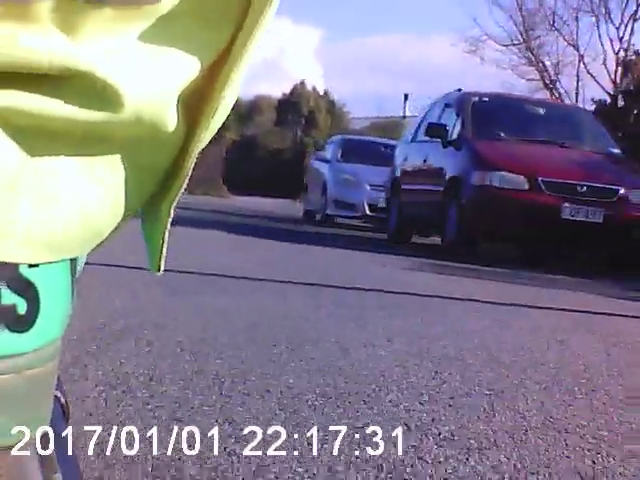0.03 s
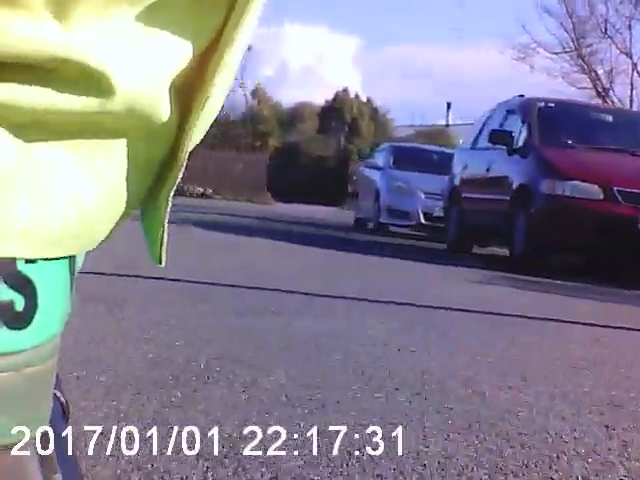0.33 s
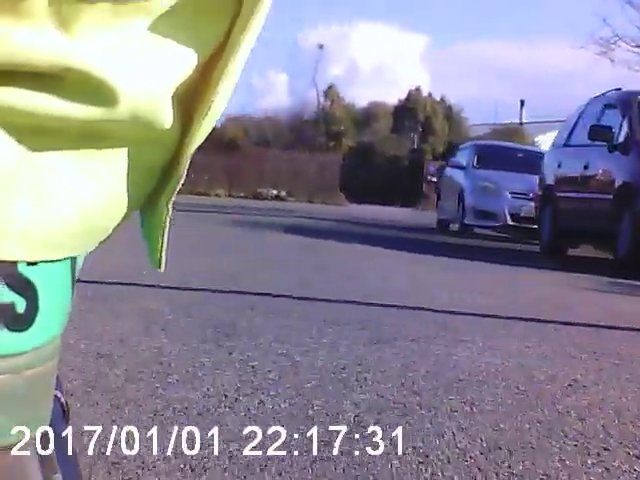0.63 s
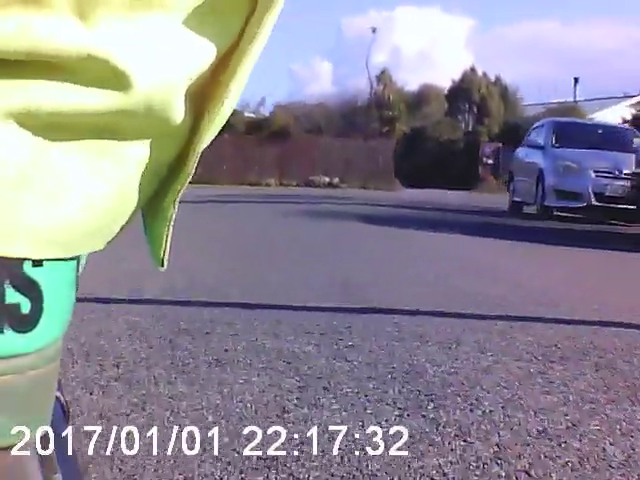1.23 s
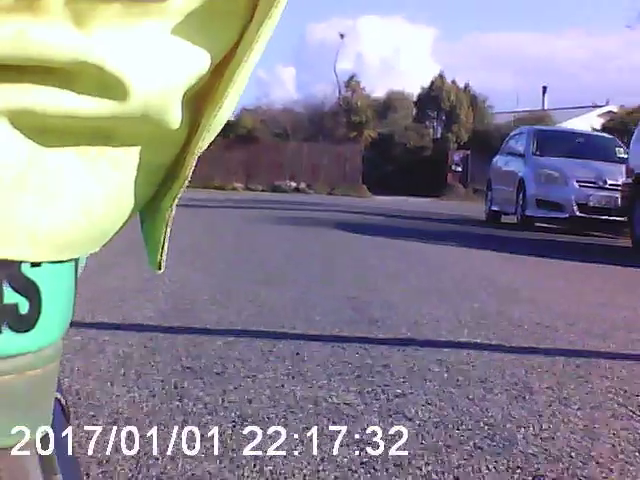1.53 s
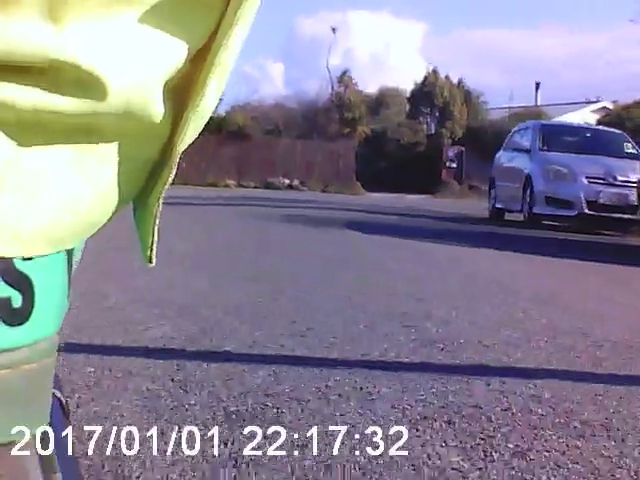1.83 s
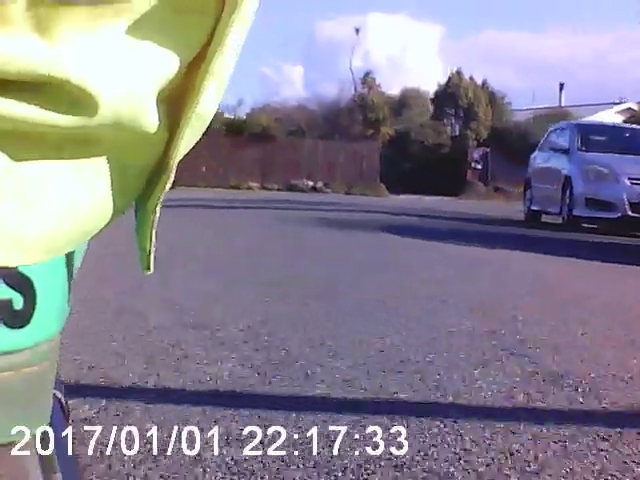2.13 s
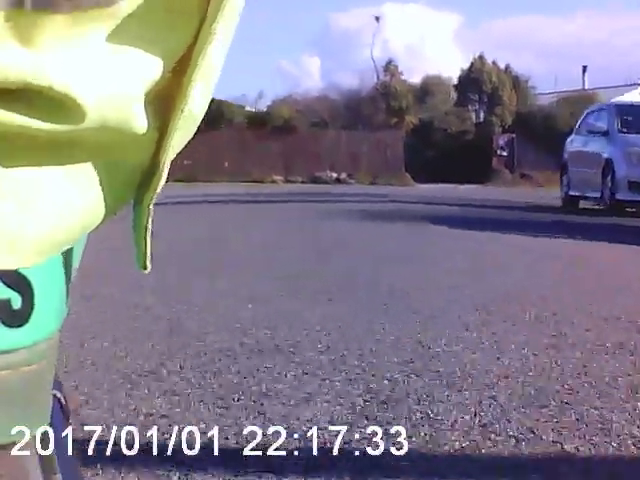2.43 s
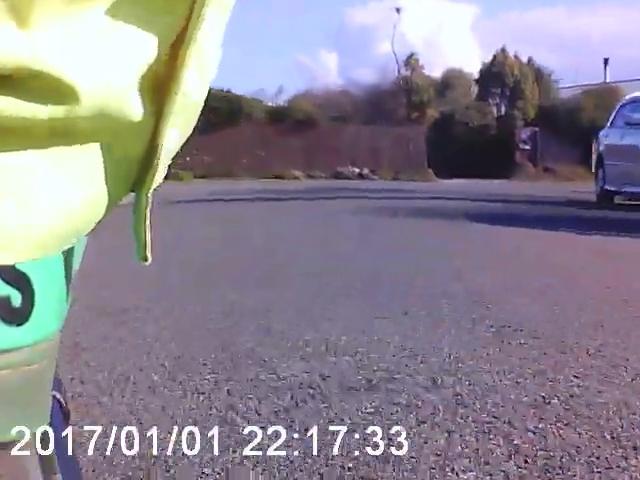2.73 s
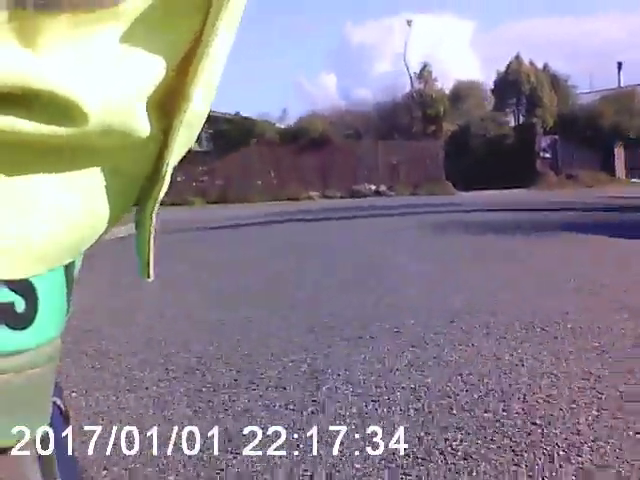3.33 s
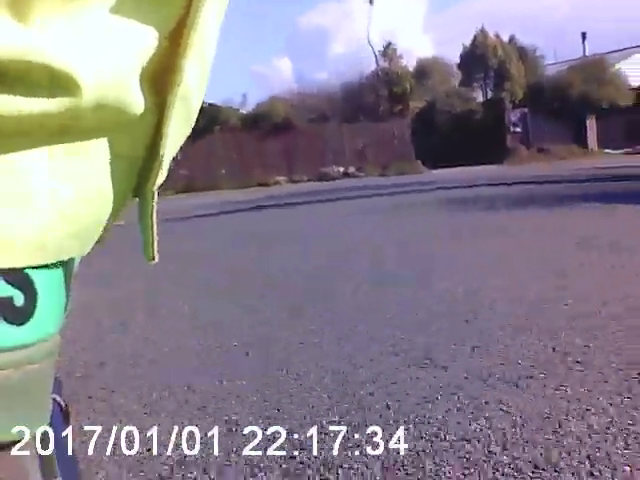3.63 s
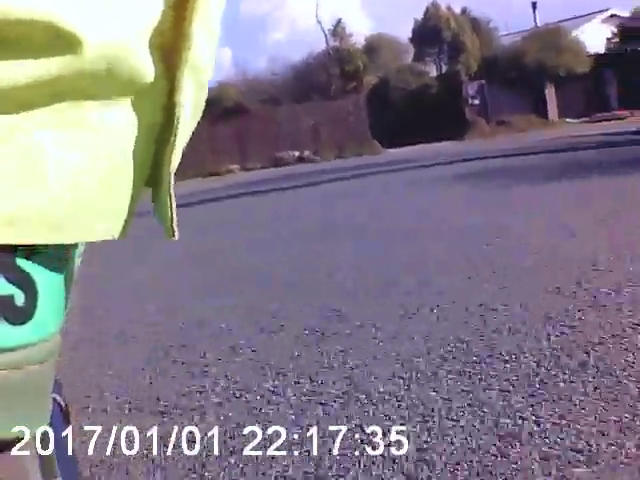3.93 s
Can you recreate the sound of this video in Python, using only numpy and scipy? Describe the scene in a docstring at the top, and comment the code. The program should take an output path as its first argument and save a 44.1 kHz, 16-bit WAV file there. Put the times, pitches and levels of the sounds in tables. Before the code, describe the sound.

An electric scooter rolls over coarse asphalt with a low rumble, hollow knocks and a clacking loose panel. Near the end a whine climbs, wind rises and the microphone fixed to it overloads and crackles.

```python
"""Electric scooter on coarse asphalt

The road shakes the frame of a scooter, heard from a small camera fixed to it. Impacts excite the damped
modes of the hollow body and a loose panel, which thud and clack, and a gritty buzz rides on the rumble
whenever it is strong. Near the end the ride speeds up: a whine climbs, the frame throbs,
wind rises and the microphone overloads and crackles."""
import sys
import numpy as np
from scipy import signal
from scipy.fft import rfft, irfft, next_fast_len
from scipy.io import wavfile
from scipy.ndimage import uniform_filter1d, map_coordinates

SR = 44100
rng = np.random.default_rng(int(sys.argv[2]) if len(sys.argv) > 2 else 0)


def inscribe(sig):
    """Save sig as 16-bit PCM at rate SR to the path in sys.argv[1].

    A 1-D sig is mono; a 2-D sig holds one channel per row.
    Samples are clipped to [-1, 1] before scaling.
    """
    pcm = np.round(np.clip(np.atleast_2d(sig).T, -1, 1) * 32767)
    wavfile.write(sys.argv[1], SR, pcm.astype(np.int16))


N = 176400

# noise spectra (frequency [Hz], relative density [dB])
HISS_SPECTRUM = [(2000, 0), (7500, -2), (9000, -21.5)]
WIND_SPECTRUM = [(60, -25.5), (150, -2), (230, 1), (380, 0.5), (480, -6), (650, -12), (1000, -21),
                 (2000, -21), (4000, -46), (8000, -68.5)]
TYRE_SPECTRUM = [(60, -20.5), (150, -14.5), (240, 2.5), (400, 0.5), (480, -10), (600, -10.5), (850, -23),
                 (1600, -24.5), (3000, -48), (7500, -50)]
GRIT_SPECTRUM = [(300, -5.5), (1000, -0.5), (1900, 10.5), (3700, 4.5), (4600, -5), (5600, -9.5),
                 (6500, -15), (8000, -26)]
CRACKLE_SPECTRUM = [(300, -12), (1000, -4), (1900, 2.5), (3600, 3.5), (4600, -4.5), (5600, -3.5),
                    (6500, -12.5), (8000, -21.5)]
ROAD_SPECTRUM = [(10, -5.5), (20, -16), (33, -6), (50, 0.5), (75, -1.5), (102, 0), (118, -7.5), (140, -21),
                 (200, -47.5), (400, -97)]
# noise envelopes (time [s], level [dB])
WIND_LEVEL = [(0, -54), (2.8, -34.5), (3.1, -29.5), (3.4, -16), (3.63, -22.5), (3.78, -19), (3.855, -21),
              (3.94, -14.5), (4, -15.5)]
ROLLING_LEVEL = [(0, -31.5), (.6, -37), (1.2, -31.5), (1.8, -35), (2.5, -33), (4, -35)]
CRACKLE_LEVEL = [(3.128, -36.5), (3.19, -34), (3.27, -31.5), (3.34, -35.5), (3.45, -26.5), (3.52, -32),
                 (3.595, -26.5), (3.612, -65), (3.632, -60), (3.645, -30), (3.7, -38.5), (3.73, -49),
                 (3.78, -32.5), (3.835, -53), (3.85, -76), (3.885, -32), (4, -29.5)]
ROAD_LEVEL = [(0.0, -11.5), (0.09, -15), (0.34, -12), (0.37, -19.5), (0.48, -17), (0.69, -14.5),
              (0.72, -10), (0.98, -14.5), (1.1, -18.5), (1.16, -9.5), (1.2, -19), (1.26, -9.5), (1.3, -17),
              (1.47, -6.5), (1.5, -15), (1.84, -13), (1.87, -15.5), (1.97, -11.5), (2.01, -14.5),
              (2.21, -10.5), (2.55, -16), (2.58, -25.5), (2.62, -12), (2.72, -23.0), (2.74, -14.5),
              (2.87, -10.5), (2.9, -21.5), (2.93, -12.5), (3.12, -10.5), (3.28, -7), (3.34, -16),
              (3.5, -8.5), (3.62, -20), (3.76, -7.5), (3.84, -14), (4, -11.5)]
# gliding tones (time [s], frequency [Hz], level [dB])
MOTOR_TONE = [(0, 613.6, -51.5), (.7, 564.5, -45.5), (1.3, 570, -42.5), (1.8, 557, -53), (2.05, 563, -41.5),
              (2.75, 531, -51), (2.88, 586, -35.5), (3.1, 642, -53)]
WHINE_TONE = [(2.798, 180.4, -50), (2.98, 215.3, -23), (3.122, 242.9, -26), (3.182, 260.1, -20),
              (3.33, 305, -29), (3.45, 339.4, -11), (3.56, 395, -24.5), (3.679, 395, -35.5),
              (3.79, 385.2, -24.5), (3.882, 363.4, -28), (3.94, 340.4, -19), (4, 342, -13)]
THROB_TONE = [(2.8, 74.49, -36.5), (2.95, 75.8, -19), (3.12, 80.15, -27.5), (3.18, 79.26, -5),
              (3.27, 78.75, -11.5), (3.34, 87.57, 3), (3.41, 90.59, -1.5), (3.5, 98.82, -2.5),
              (3.59, 105.3, -4.5), (3.62, 107.5, -8.5), (3.68, 97, -5.5), (3.82, 95.68, -14),
              (4, 94.63, -6.5)]
# resonances of the loose panel (frequency [Hz], bandwidth [Hz], gain [dB])
PANEL_MODES = [(614, 93, 1), (815, 63, -1.5), (1057, 195, -3.5), (1346, 48, -4), (1433, 37, 3),
               (1572, 205, 0), (1785, 97, -2), (1976, 148, -2.5), (2611, 50, -12), (2740, 55, -14.5),
               (4400, 990, -24)]
# treble loss of small, light parts (frequency [Hz], gain [dB])
RATTLE_ROLLOFF = [(2300, -5), (4000, -10.5)]
# modes of the hollow body and of the ringing metal (frequency [Hz], level [dB], T60 [s])
BODY_MODES = [(239.7, -1.5, 0.033), (271.5, -1.5, 0.042), (336.8, 0, 0.03), (393.8, -1.5, 0.05),
              (535, -15.5, 0.012), (1084, -16.5, 0.052)]
METAL_MODES = [(1304, -39, 0.7), (1480, -30.5, 0.31), (1543, -26.5, 0.3), (1750, -30.5, 0.18)]
# rubbing joints (time [s], frequency [Hz], level [dB], duration [s], octave level [dB], glide [Hz/s])
JOINT_SQUEAKS = [(0.198, 345, -18, 0.049, -16, -1400), (0.31, 724, -19.5, 0.015, -5.5, 1),
                 (2.789, 344.3, -16, 0.094, -35.5, 61.5)]
# knocks of the hollow body (time [s], level [dB])
BODY_THUDS = [(0.13, -12.5), (0.191, -6), (0.747, -13), (0.765, -9.5), (0.924, -13.5), (1.014, -13.5),
              (1.057, -13.5), (1.157, -9.5), (1.249, -8), (1.395, -7.5), (1.444, -8.5), (1.539, -11),
              (1.639, -17.5), (1.699, -14.5), (1.849, -12.5), (1.906, -13), (2.153, -10.5), (2.208, -14.5),
              (2.246, -20.5), (2.351, -15), (2.447, -10), (2.497, -15.5), (2.588, -14.5), (2.648, -12.5),
              (2.714, -15), (2.761, -8.5)]
# impacts of the panel on the frame (time [s], level [dB], contact time [s])
PANEL_CLACKS = [(.191, -3.5, 0.0068), (0.29, -15.5, 0.012), (0.735, -16.5, 0.004), (0.748, -8, 0.013),
                (0.8102, -2.5, 0.0026), (0.833, -10.5, 0.008), (0.854, -8.5, 0.0037),
                (0.929, -29.5, 0.0032), (1.016, -28, 0.005), (1.057, -10.5, 0.0035), (1.096, -21.5, 0.0046),
                (1.158, -8, 0.0044), (1.193, -14.5, 0.0035), (1.2529, -2, 0.0018), (1.283, -14.5, 0.0025),
                (1.344, -13.5, 0.015), (1.398, -8, 0.0092), (1.418, 2, 0.013), (1.445, -4.5, 0.0034),
                (1.487, -9, 0.004), (1.5415, -10.5, 0.0025), (2.151, -2, 0.0034), (2.352, -12.5, 0.007),
                (2.4445, -3.5, 0.012), (2.549, -15.5, 0.001), (2.648, 3, 0.0092), (2.747, -16.5, 0.0036),
                (2.76, 2.5, 0.012)]
# sharp ticks and the loudest cracks of distortion (time [s], peak level [dB])
SHARP_TICKS = [(0.445, -17), (1.419, -9.5), (1.444, -13.5), (2.762, -13), (3.226, -14), (3.348, -7.5),
               (3.36, -9.5), (3.392, -4.5), (3.415, -4.5), (3.549, -13), (3.682, -7.5), (3.967, -15)]
# gritty bursts after sharp bumps (time [s], level [dB], half-width [s])
GRIT_BURSTS = [(0.128, -32.5, 0.0061), (0.163, -29.5, 0.0021), (0.212, -15.5, 0.0079),
               (0.254, -27.5, 0.009), (0.304, -31, 0.0055), (0.393, -31, 0.0082), (0.482, -32.5, 0.0045),
               (0.771, -29, 0.011), (1.167, -36.5, 0.0063), (1.257, -33.5, 0.018), (1.455, -27.5, 0.012),
               (1.844, -32, 0.012), (2.193, -39.5, 0.048), (2.46, -32.5, 0.025), (2.773, -18.5, 0.0086),
               (2.81, -41, 0.022), (3.235, -18, 0.0048)]
# bumps that set the frame swinging (time [s], level [dB])
ROAD_BUMPS = [(0.193, 7), (0.748, -10), (1.435, -6), (2.226, 4.5), (2.75, 3)]


def amp(db):
    """Decibels to gain."""
    return 10 ** (np.asarray(db) / 20)


def unit(x):
    """Scale to rms 1."""
    return x / np.sqrt(np.mean(x ** 2) + 1e-20)


def curves(rows):
    """One value per sample for each column after the time."""
    s, *cols = np.transpose(rows)
    return [np.interp(np.arange(N) / SR, s, c) for c in cols]


def wobble(rate):
    """A smooth random curve, rate knots a second."""
    return map_coordinates(rng.standard_normal(N // 20), [np.arange(N) * rate / SR], mode="wrap")


def filtered(x, response):
    """x times a response of frequency."""
    m = next_fast_len(len(x) + SR // 2)
    return irfft(rfft(x, m) * response(np.fft.rfftfreq(m, 1 / SR)), m)[:len(x)]


def colour(x, points):
    """Shape x by (Hz, dB) points on a log axis."""
    f, db = np.transpose(points)
    return filtered(x, lambda hz: amp(np.interp(np.log(hz + 1), np.log(f), db)))


def noise(points):
    """Coloured noise of rms 1."""
    return unit(colour(rng.standard_normal(N), points))


def add(track, s, sound):
    """Mix a sound in at time s."""
    part = track[max(0, round(s * SR)):][:len(sound)]
    part += sound[:len(part)]


def ring(modes, t, scatter_db):
    """Free vibration: a sum of damped modes, each excited with a slightly random strength."""
    return sum((-1) ** k * amp(db + scatter_db * rng.standard_normal() - 60 * t / t60)
               * np.sin(2 * np.pi * hz * t) for k, (hz, db, t60) in enumerate(modes))


def tone(rows, waver, flutter_db, rate):
    """A gliding sinusoid with random frequency and amplitude modulation."""
    hz, db = curves(rows)
    phase = 2 * np.pi * np.cumsum(hz * (1 + waver * wobble(rate))) / SR
    return np.sqrt(2) * amp(db + flutter_db * wobble(rate)) * np.sin(phase)


def panel(x, corner_hz=4500):
    """Forced response of the loose panel: parallel resonators and a first-order low-pass."""
    def response(f):
        modes = sum((-1) ** k * amp(db) * 1j * f * width / (hz * hz - f * f + 1j * f * width)
                    for k, (hz, width, db) in enumerate(PANEL_MODES))
        return modes / (1 + 1j * f / corner_hz)
    return filtered(x, response)


def hiss(level_db=-61.5):
    """Self-noise of the microphone, faint and stationary."""
    return amp(level_db) * noise(HISS_SPECTRUM)


def wind():
    """Turbulence: buffeting air grows louder as the ride speeds up."""
    return amp(curves(WIND_LEVEL)[0] + 1.5 * wobble(25)) * noise(WIND_SPECTRUM)


def motor():
    """Tonal noise of the motor, thin and randomly modulated."""
    return tone(MOTOR_TONE, waver=0.0089, flutter_db=4, rate=16)


def tyres():
    """Rolling noise: coarse asphalt excites the tyres over a broad band."""
    return amp(curves(ROLLING_LEVEL)[0] + 3.5 * wobble(14)) * noise(TYRE_SPECTRUM)


def whine(upper_ratio=1.62, upper_db=-11):
    """Two inharmonic partials whose frequencies climb with speed, then sag a little."""
    upper = [(s, hz * upper_ratio, db + upper_db) for s, hz, db in WHINE_TONE]
    return sum(tone(partial, waver=0.01957, flutter_db=0.5, rate=27) for partial in (WHINE_TONE, upper))


def rattle(rest_db=-47.5, kick_db=-26, t60=0.53, ticks_per_s=200):
    """Shot noise: small loose parts tick against the panel, louder after each thud."""
    t = np.arange(N) / SR
    stirred = sum((t > s) * amp(db + kick_db - 60 * np.abs(t - s) / t60) for s, db in BODY_THUDS)
    ticks = (rng.random(N) < ticks_per_s / SR) * rng.uniform(-1, 1, N)
    flurries = amp(15 * np.tanh(wobble(40)))
    return (amp(rest_db) + stirred) * unit(colour(panel(ticks * flurries), RATTLE_ROLLOFF))


def squeaks():
    """Friction-induced vibration: rubbing joints briefly sound a fundamental and its octave."""
    out = np.zeros(N)
    for s, hz, db, duration, octave_db, glide in JOINT_SQUEAKS:
        t = np.arange(int(duration * SR)) / SR
        phase = 2 * np.pi * (hz + glide * t / 2) * t
        envelope = amp(db) * np.sqrt(np.sin(np.pi * t / duration))
        add(out, s, envelope * (np.sin(phase) + amp(octave_db) * np.sin(2 * phase)))
    return out


def thuds(rise_s=0.0004, rasp_t60=0.056):
    """Impact excitation: each knock rings the modes of the hollow body and shakes the panel a little."""
    out, t = np.zeros(N), np.arange(SR // 4) / SR
    for s, db in BODY_THUDS:
        detune = 1 + 0.021 * rng.standard_normal()
        blow = ring(BODY_MODES, t * detune, scatter_db=2.5) * (1 - np.exp(-t / rise_s))
        rasp = panel(rng.standard_normal(len(t)) * amp(-60 * t / rasp_t60))
        add(out, s, amp(db + 2) * (blow / np.abs(blow).max() + amp(-15.5) * rasp / np.abs(rasp).max()))
    return out


def clacks(first_blow=0.33, tail_t60=0.06):
    """Repeated contact: the panel hits the frame and clatters; the hardest blows set metal ringing."""
    out, t = np.zeros(N), np.arange(SR // 3) / SR
    for s, db, contact_s in PANEL_CLACKS:
        contact = np.exp(-(t / (1.2 * contact_s)) ** 2) + amp(-27 - 60 * t / tail_t60)
        clatter = rng.choice([-1, 1], len(t)) * contact
        clatter[0] = first_blow * np.linalg.norm(clatter)
        hit = panel(clatter)
        metal = amp(db) * ring(METAL_MODES, t, scatter_db=-0.5)  # in all, 2 dB per dB of clack
        add(out, s, amp(db - 3) * (hit / np.abs(hit).max() + metal))
    return out


def sharp_ticks(shake, t60=0.008):
    """Transients: sharp ticks and the loudest cracks of distortion, near the rumble's zero crossings."""
    out, t = np.zeros(N), np.arange(SR // 50) / SR
    reach = SR // 350  # samples either side of the listed time
    for s, db in SHARP_TICKS:
        nearby = shake[round(s * SR) - reach:][:2 * reach]
        crossing = np.argmin(np.abs(nearby)) - reach
        crack = colour(rng.standard_normal(len(t)) * amp(-60 * t / t60), CRACKLE_SPECTRUM)
        add(out, s + (crossing - reach / 6) / SR, amp(db) * crack / np.abs(crack).max())
    return out


def distortion(shake, onset_swing=0.18, full_swing=0.4, buzz_db=-41):
    """Modulated noise: a buzz on strong rumble, bursts at bumps, crackle on each swing at speed."""
    t = np.arange(N) / SR
    swing = signal.hilbert(shake)
    velocity = np.sin(np.angle(swing))  # normalised; extreme at mid-swing, once each way
    strength = np.clip((np.abs(swing) - onset_swing) / (full_swing - onset_swing), 0, 1) ** 2
    grit = rng.standard_normal(N) * amp(2 * wobble(1100) + 3 * np.tanh(wobble(130)))
    buzz = amp(buzz_db) * unit(colour(grit * strength * (velocity ** 2 + 0.2), GRIT_SPECTRUM))
    pulses = (velocity ** 20 + 0.04) * amp(2.5 * velocity + 3 * np.tanh(wobble(170)))
    crackle_gain = amp(curves(CRACKLE_LEVEL)[0]) * (t > CRACKLE_LEVEL[0][0])
    crackle = crackle_gain * unit(colour(grit * pulses, CRACKLE_SPECTRUM))
    burst_gain = sum(amp(db) * np.exp(-((t - s) / width) ** 2) for s, db, width in GRIT_BURSTS)
    return buzz + crackle + burst_gain * unit(colour(grit, GRIT_SPECTRUM))


def frame(mode_hz=98.26, t60=0.24, rise_s=0.0072):
    """Forced and free vibration: the frame rumbles with the road, rings at bumps, throbs at speed."""
    road = noise(ROAD_SPECTRUM)
    running_rms = np.sqrt(np.abs(uniform_filter1d(road ** 2, size=1800)) + 1e-6)
    shake = road / running_rms * amp(curves(ROAD_LEVEL)[0] + 1)
    t = np.arange(SR // 2) / SR
    for s, db in ROAD_BUMPS:
        envelope = amp(db - 60 * t / t60) * (1 - np.exp(-t / rise_s))
        add(shake, s, envelope * np.sin(2 * np.pi * mode_hz * t))
    return shake + tone(THROB_TONE, waver=0.03086, flutter_db=2.5, rate=35)


def scene():
    """Superposition of all sources at the camera, in one channel."""
    shake = frame()
    knocks = sharp_ticks(shake) + thuds() + clacks() + rattle() + squeaks()
    return (shake + distortion(shake) + knocks + tyres() + whine() + motor() + wind() + hiss())[None]


def record(dry, limit=0.71, band_hz=8400, top_hz=16000):
    """Saturation: the camera clips hard and limits the band; the overshoot is clipped and cut again."""
    clipped = np.clip(dry[0], -limit, limit)
    narrow = filtered(clipped, lambda hz: 1 / np.sqrt(1 + (hz / band_hz) ** 60))
    return filtered(np.clip(narrow, -limit, limit), lambda hz: hz < top_hz)[None]


dry = scene()
out = record(dry)
inscribe(out)
```